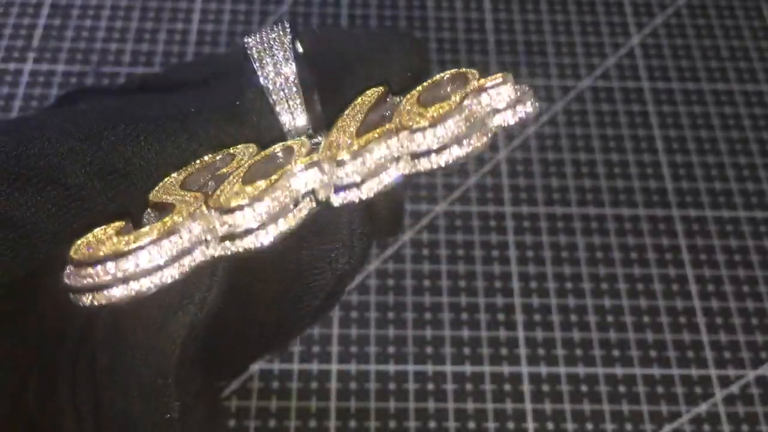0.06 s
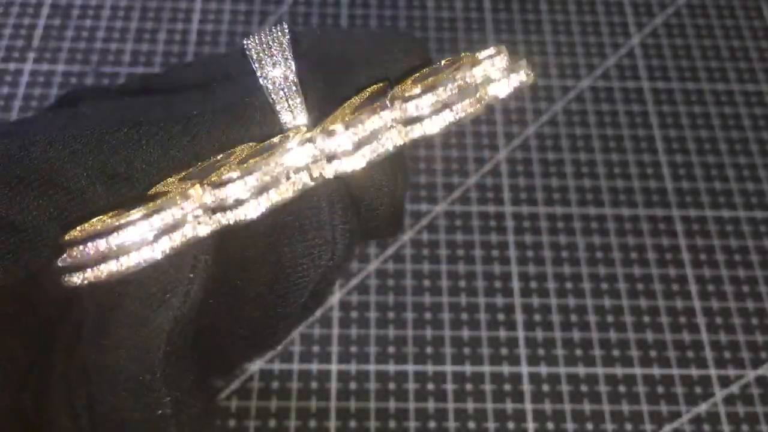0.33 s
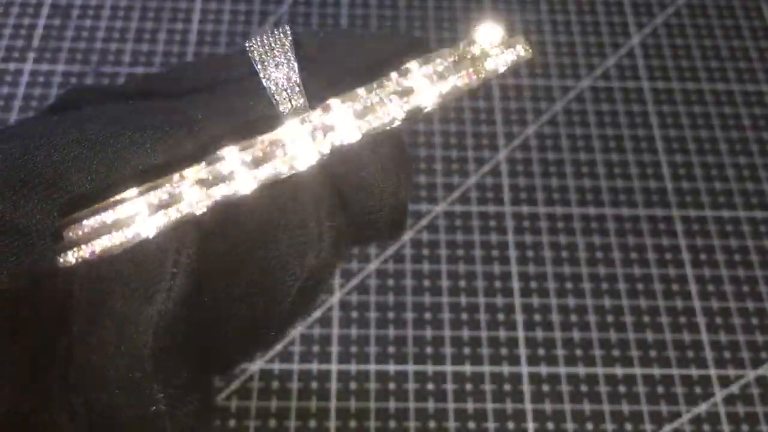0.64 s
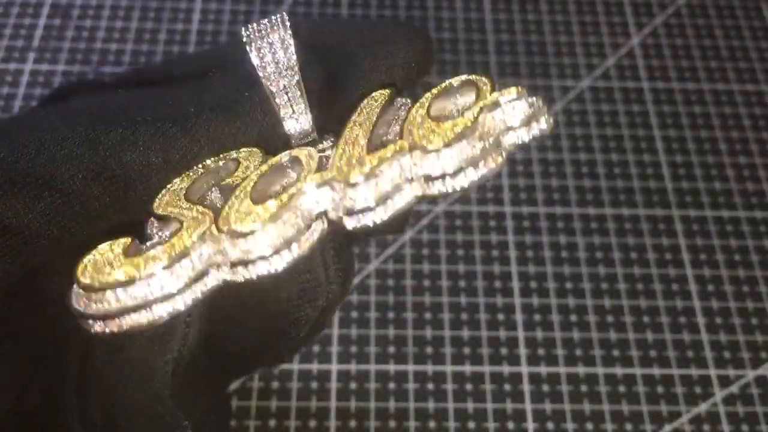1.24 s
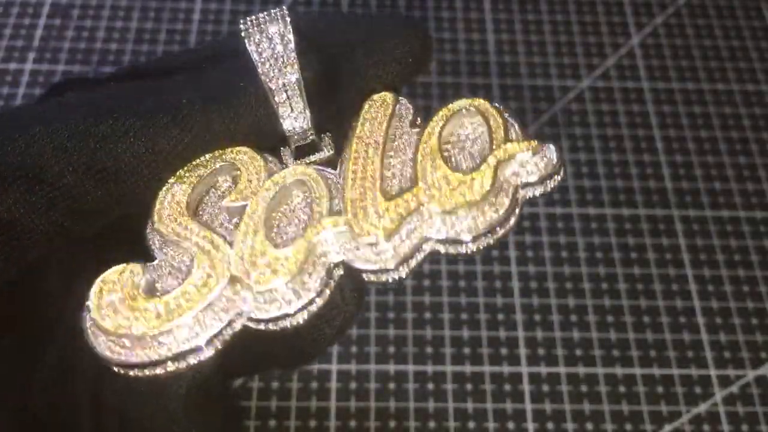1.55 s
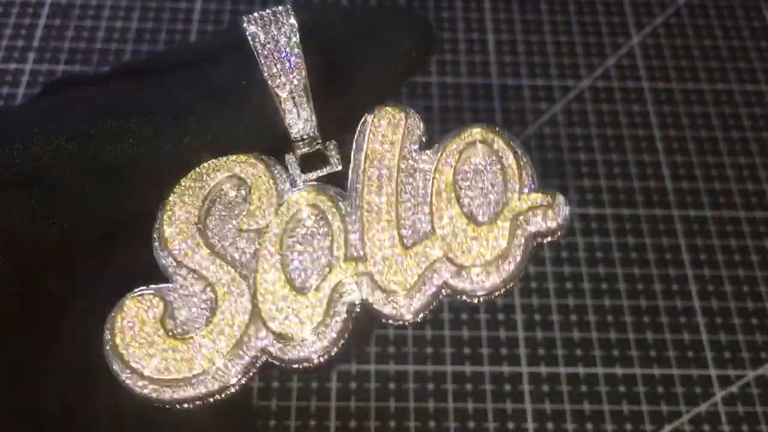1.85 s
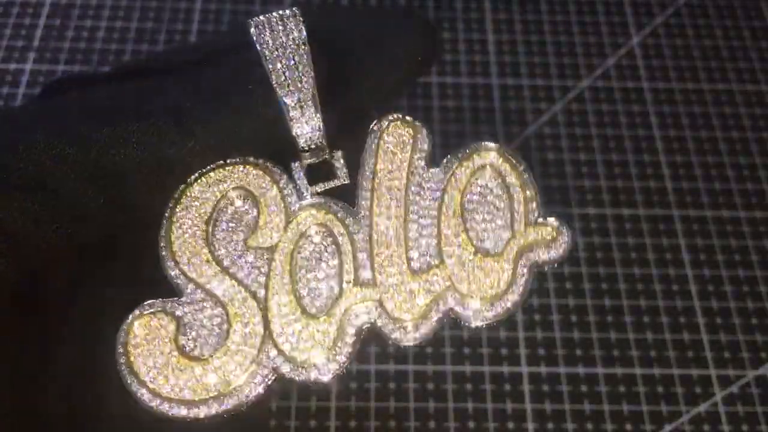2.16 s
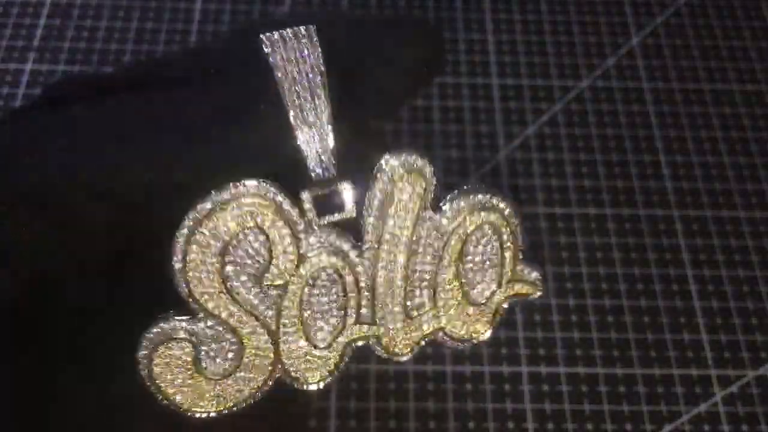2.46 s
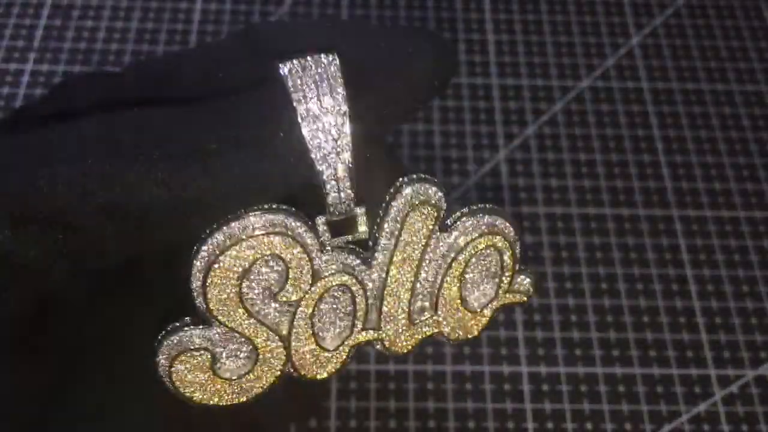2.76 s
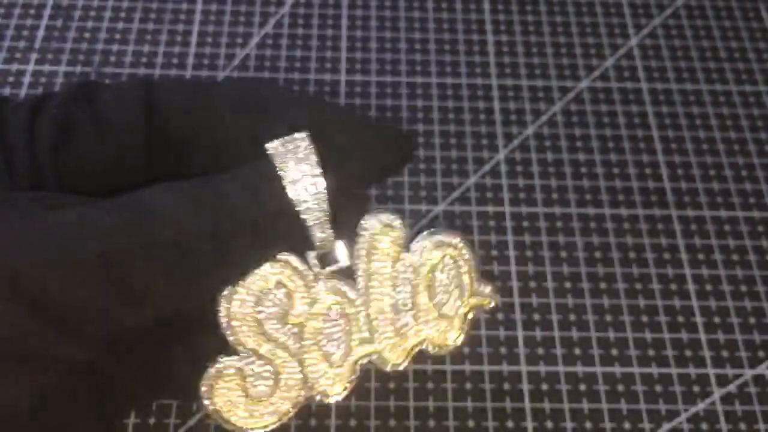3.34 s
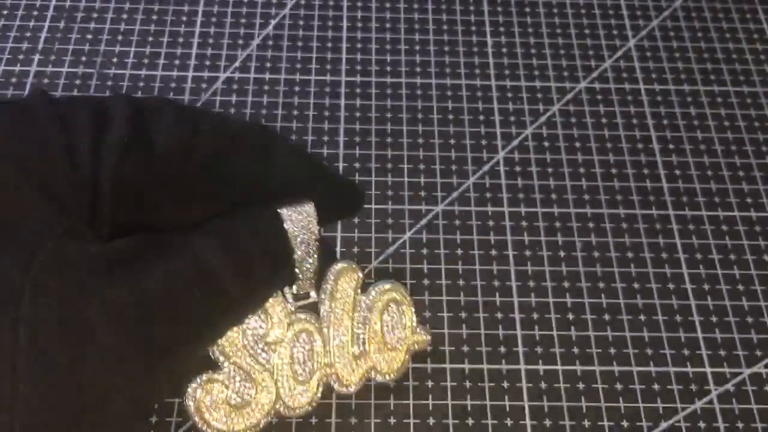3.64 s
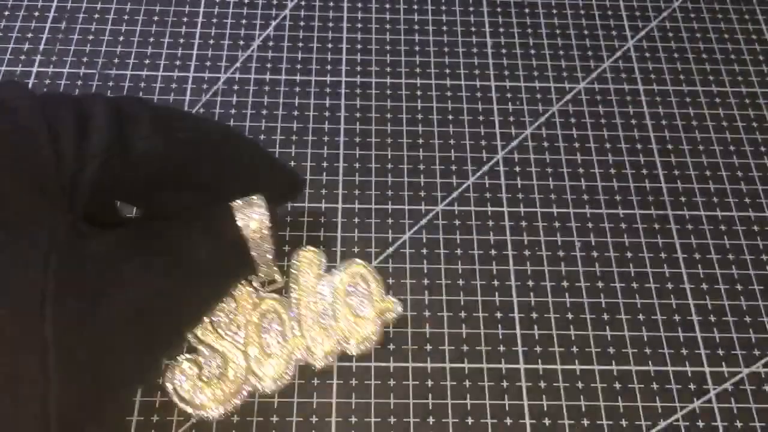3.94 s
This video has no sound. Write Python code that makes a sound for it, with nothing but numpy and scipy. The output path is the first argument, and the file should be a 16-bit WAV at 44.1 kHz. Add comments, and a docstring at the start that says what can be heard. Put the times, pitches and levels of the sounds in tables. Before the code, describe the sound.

A metal pendant knocks down onto a mat after faint glove rustles and two clicks.

```python
"""A quiet room: ventilation rumbles and throbs, a fan whirs faintly, both throughout.
From about 3 s a gloved hand rustles, turning a small metal pendant over a cutting mat.
At 3.45 s the pendant clicks twice against its bail. It is set down with a sharp knock at 3.75 s,
a duller one at 3.89 s, then three faint taps; the table under the mat thumps, the metal rings
faintly and the room answers."""
import sys
import numpy as np
from scipy import signal
from scipy.fft import rfft, irfft, next_fast_len
from scipy.io import wavfile
from scipy.ndimage import map_coordinates

SR = 44100
rng = np.random.default_rng(int(sys.argv[2]) if len(sys.argv) > 2 else 0)


def waveform_to_disk(signal):
    """Save audio, clipped to [-1, 1], as 16-bit WAV at the path in sys.argv[1]."""
    frames = np.transpose(np.atleast_2d(signal))
    scaled = np.clip(frames, -1, 1) * 32767
    samples = np.round(scaled).astype(np.int16)
    wavfile.write(sys.argv[1], SR, samples)


N = 176400


def amp(db):
    """Decibels to gain."""
    return 10 ** (np.asarray(db) / 20)


def unit_rms(x):
    """Scale to rms 1."""
    return x / np.sqrt(np.mean(x ** 2) + 1e-20)


def log_interp(points, hz):
    """(f/Hz, value) points read on a log frequency axis."""
    f, values = np.transpose(points)
    return np.interp(np.log(hz + 1), np.log(f), values)


def envelope(points):
    """Gain per sample from (t/s, level/dB) points."""
    return amp(np.interp(np.arange(N) / SR, *np.transpose(points)))


def filtered(x, response):
    """Apply a frequency response."""
    size = next_fast_len(len(x) + SR // 2)
    return irfft(rfft(x, size) * response(np.fft.rfftfreq(size, 1 / SR)), size)[:len(x)]


def coloured(x, spectrum):
    """Shape by (f/Hz, level/dB) points, to rms 1."""
    return unit_rms(filtered(x, lambda hz: amp(log_interp(spectrum, hz))))


def butter(x, hz, kind):
    """Causal second-order low-pass or high-pass."""
    return signal.sosfilt(signal.butter(2, hz, kind, fs=SR, output="sos"), x)


def add(track, start_s, sound):
    """Mix a sound into a track."""
    part = track[round(start_s * SR):][:len(sound)]
    part += sound[:len(part)]


def wander(rate_hz):
    """Smooth random curve within +-1."""
    position = np.arange(N) * rate_hz / SR
    return np.tanh(map_coordinates(rng.standard_normal(400), [position], mode="wrap"))


# steady air noise: f/Hz, level/dB
AIR_SPECTRUM = [(20, -30), (35, -16.5), (60, -18.5), (79, 5.5), (105, -4.5), (170, 1), (250, -9),
                (400, -17), (700, -18), (850, -18), (1050, -16), (1250, -20), (2000, -27.5), (3200, -36),
                (5000, -38.5), (6200, -39), (8000, -41), (14000, -49.5)]
# rumble throbs: t/s, length/s, rise/dB
RUMBLE_THROBS = [(0.473, 0.23, 4.5), (0.818, 0.048, 6.5), (1.174, 0.098, 3), (1.555, 0.044, 8.5),
                 (1.725, 0.036, 10.5), (2.17, 0.1, 9), (2.533, 0.036, 5.5), (2.644, 0.041, 9.5),
                 (2.72, 0.026, 9), (2.868, 0.045, 11)]


def ventilation(level_db=-60.5, rumble_hz=310, sway_db=4.5):
    """Steady hiss over a rumble that sways a little and throbs now and then."""
    t = np.arange(N) / SR
    air = coloured(rng.standard_normal(N), AIR_SPECTRUM)
    rumble = filtered(air, lambda hz: 1 / (1 + (hz / rumble_hz) ** 4))
    hiss = air - rumble
    throb_db = sum(rise_db * np.exp(-(2 * (t - peak_s) / length_s) ** 2)
                   for peak_s, length_s, rise_db in RUMBLE_THROBS)
    return amp(level_db) * (hiss + rumble * amp(sway_db * wander(rate_hz=16) + throb_db))


def fan_whir(level_db=-75.5, centre_hz=982, width_hz=150, flutter_db=6):
    """Narrow band of fan noise, fluttering gently."""
    band = filtered(rng.standard_normal(N), lambda hz: 1 / (1 + (2 * (hz - centre_hz) / width_hz) ** 2))
    return amp(level_db + flutter_db * wander(rate_hz=31)) * unit_rms(band)


def friction(spectrum, grains_per_s=1300, grain_share=0.44):
    """Fibres catch and slip: tiny grains over a soft hiss."""
    slips = rng.random(N) < grains_per_s / SR
    grains = unit_rms(slips * rng.standard_normal(N))
    hiss = rng.standard_normal(N)
    return coloured(np.sqrt(grain_share) * grains + np.sqrt(1 - grain_share) * hiss, spectrum)


# rub, slide and hand envelopes: t/s, level/dB
RUB_LEVELS = [(2.9, -80.5), (3.215, -73), (3.285, -64), (3.365, -60.5), (3.41, -72), (3.45, -62),
              (3.56, -70.5), (3.64, -68.5), (3.69, -66), (3.73, -66), (3.85, -68.5), (3.91, -58.5),
              (3.95, -73), (4, -61)]
SLIDE_LEVELS = [(3.5, -86), (3.74, -80), (3.79, -83), (3.812, -63), (3.84, -76), (3.87, -59), (3.91, -66),
                (3.95, -64), (4, -75)]
HAND_LEVELS = [(3, -72), (3.16, -54), (3.27, -62.5), (3.46, -60.5), (3.5, -45.5), (3.54, -56.5),
               (3.68, -61.5), (3.715, -64), (3.748, -55), (3.765, -50), (3.81, -52), (3.87, -58),
               (3.93, -46), (4, -50)]
# their spectra: f/Hz, level/dB
RUB_SPECTRUM = [(150, -15), (600, 1.5), (1500, 0.5), (3000, 2), (5000, -6), (6500, -7.5), (8000, -11.5),
                (13000, -13)]
SLIDE_SPECTRUM = [(500, -23), (3000, -10), (5000, -2), (6700, 4), (7800, -8), (9000, 3.5), (10300, -8),
                  (12000, 3.5), (14000, -4)]
HAND_SPECTRUM = [(30, -39), (70, -29), (110, 2.5), (190, -4.5), (300, -11.5), (600, -26), (1500, -22.5),
                 (5000, -83)]


def glove():
    """Cloth rubs the pendant and slides on the mat while the hand bumps softly."""
    rub = envelope(RUB_LEVELS) * friction(RUB_SPECTRUM)
    slide = envelope(SLIDE_LEVELS) * friction(SLIDE_SPECTRUM)
    bumps = envelope(HAND_LEVELS) * friction(HAND_SPECTRUM)
    return rub + slide + bumps


def struck(modes, attack_s=0.00013):
    """One blow starts all damped modes together, each at a slightly random level."""
    t = np.arange(SR // 2) / SR
    ring = sum(amp(db + rng.normal(0, 1) - 60 * t / t60_s) * np.sin(2 * np.pi * hz * t)
               for hz, db, t60_s in modes)
    return ring * (1 - np.exp(-t / attack_s))


def crack(level_db, t60_s):
    """Brief contact noise."""
    t = np.arange(SR // 2) / SR
    return amp(level_db - 60 * t / t60_s) * rng.standard_normal(len(t))


# bright modes of pendant and bail: f/Hz, level/dB, t60/s
SNAP_MODES = [(1240, -3.5, .012), (1780, 2, 0.0085), (2280, -5, .004), (3090, -11.5, 0.019),
              (3470, -1, 0.0039), (3950, -3, 0.0062), (6030, -4, 0.0066), (6560, -2.5, 0.004)]
# low modes of the held pendant: f/Hz, level/dB, t60/s
BODY_MODES = [(402, -16, 0.051), (481, -2, 0.038), (653, -11.5, 0.087)]
# pendant on bail: t/s, snap level/dB, body level/dB, snap high-pass/Hz
BAIL_CLICKS = [(3.451, -42, -38, 4200), (3.4702, -33.5, -33, 700)]


def bail_clicks():
    """Metal snaps on metal, thinner for a light touch, over a hollow knock of the held body."""
    out = np.zeros(N)
    for start_s, snap_db, body_db, highpass_hz in BAIL_CLICKS:
        snap = struck(SNAP_MODES) + crack(level_db=-3.5, t60_s=0.0033)
        snap = butter(butter(snap, 6800, "low"), highpass_hz, "high")
        body = butter(struck(BODY_MODES), 220, "high")
        add(out, start_s, in_room(amp(snap_db) * snap + amp(body_db) * body, tail_db=-9))
    return out


# early echoes: delay/s, level/dB
ROOM_ECHOES = [(.0052, -14.5), (0.012, -17), (.019, -16.5), (.028, -24)]
# tail decay: f/Hz, t60/s
TAIL_DECAY = [(150, .5), (400, 0.37), (1200, 0.18), (3000, 2), (10000, 0.73)]
# tail colour: f/Hz, level/dB
TAIL_SPECTRUM = [(100, -11), (300, 1.5), (600, 8.5), (1200, 3.5), (2500, -15.5), (8000, -4.5)]


def in_room(x, tail_db, build_s=0.012):
    """Direct sound, echoes off nearby surfaces and half a second of diffuse tail."""
    hz, frame_s, noise = signal.stft(rng.standard_normal(SR // 2), SR, nperseg=256)
    decay = amp(-60 * frame_s / log_interp(TAIL_DECAY, hz)[:, None])
    _, tail = signal.istft(noise * decay, SR, nperseg=256)
    tail = filtered(tail / np.linalg.norm(tail), lambda f: amp(log_interp(TAIL_SPECTRUM, f)))
    t = np.arange(len(tail)) / SR
    response = amp(tail_db) * tail * (1 - np.exp(-(t / build_s) ** 2))
    response[0] += 1  # direct path
    dull_pulse = np.hanning(11) / np.hanning(11).sum()
    for delay_s, db in ROOM_ECHOES:
        add(response, delay_s, amp(db) * dull_pulse)
    return signal.fftconvolve(x, response)


def bending_waves(x, delay_s=0.00092, ref_hz=1000):
    """Treble crosses the table ahead of bass; delay_s is the travel time at ref_hz."""
    return filtered(x, lambda hz: np.exp(-4j * np.pi * delay_s * np.sqrt(ref_hz * hz)))


# modes of the table and of the ringing metal: f/Hz, level/dB, t60/s
TABLE_MODES = [(121, -14.5, 0.48), (180, -11.5, 0.12), (257, -10, 0.082), (325, -2, 0.041),
               (465, -0.5, 0.017), (540, -5, 0.017), (832, -3, 0.027), (1047, -4, 0.026), (1189, -6, 0.029),
               (1697, -14, .04), (1793, -17, 0.039), (2710, -21.5, 0.04), (3570, -19, 0.029),
               (4400, -4, 0.0057)]
RING_MODES = [(2220, -14, .05), (2640, 1, 0.097), (6120, 1, 0.11)]
# pendant on mat: t/s, thump level/dB, softness low-pass/Hz, weight high-pass/Hz, ring level/dB
MAT_KNOCKS = [(3.7506, -21, 3370, 86, -59.5), (3.891, -25, 700, 134, -72), (3.9652, -41.5, 1510, 815, -84),
              (3.974, -41, 1510, 900, -80), (3.995, -47, 1500, 800, -84)]


def mat_knocks(mat_lowpass_hz=5300, bass_cut_hz=61):
    """The pendant meets the mat: the table thumps, duller for a soft contact, and the metal rings."""
    out = np.zeros(N)
    for start_s, thump_db, softness_hz, weight_hz, ring_db in MAT_KNOCKS:
        contact = crack(level_db=-11, t60_s=0.04)
        contact = butter(butter(contact, mat_lowpass_hz, "low"), mat_lowpass_hz, "low")
        blow = bending_waves(struck(TABLE_MODES) + contact)
        blow = butter(butter(blow, softness_hz, "low"), weight_hz, "high")
        thump = amp(thump_db) * butter(blow, bass_cut_hz, "high")
        ring = amp(ring_db) * struck(RING_MODES)
        add(out, start_s, in_room(thump + ring, tail_db=-4.5))
    return out


def scene():
    """All sources at one microphone."""
    return (ventilation() + fan_whir() + glove() + bail_clicks() + mat_knocks())[None]


def record(dry, band_limit_hz=14200):
    """Nothing passes above the band limit."""
    return np.array([filtered(x, lambda hz: hz < band_limit_hz) for x in dry])


dry = scene()
out = record(dry)
waveform_to_disk(out)
```